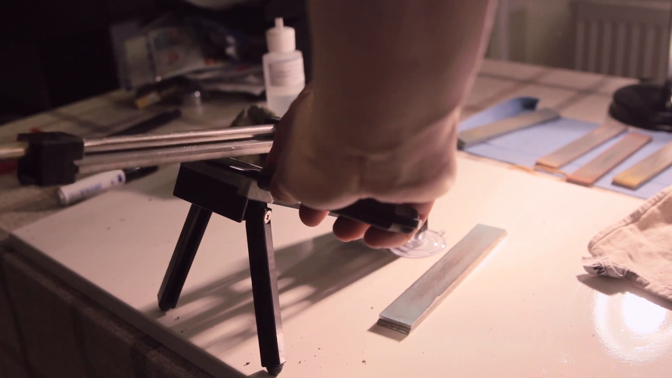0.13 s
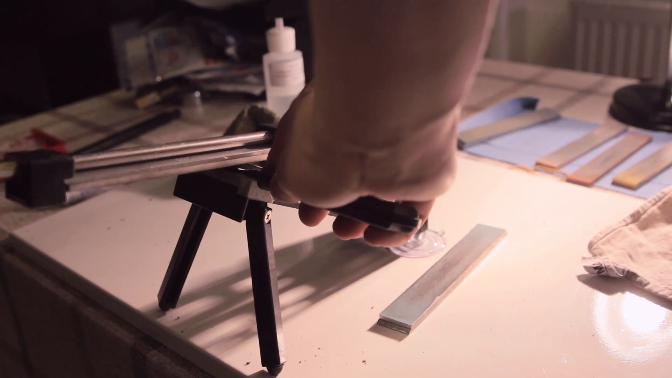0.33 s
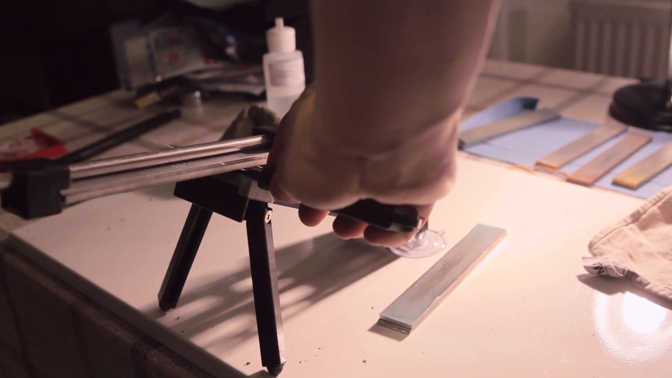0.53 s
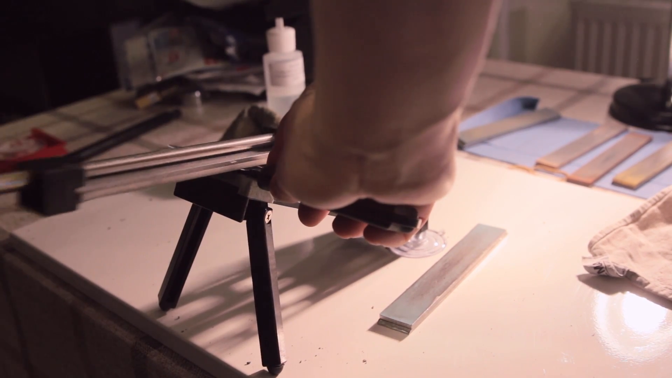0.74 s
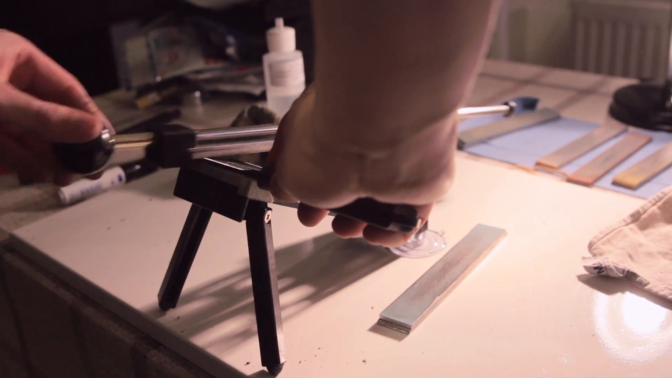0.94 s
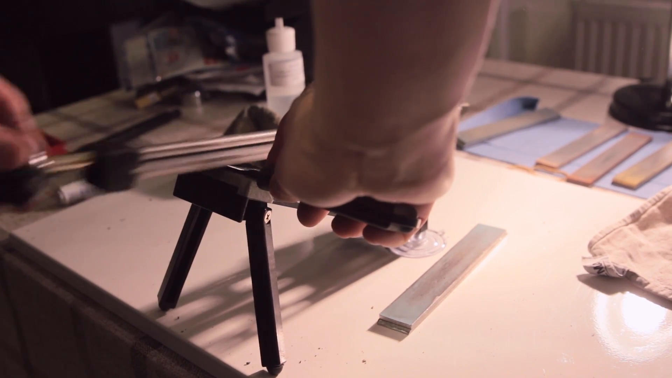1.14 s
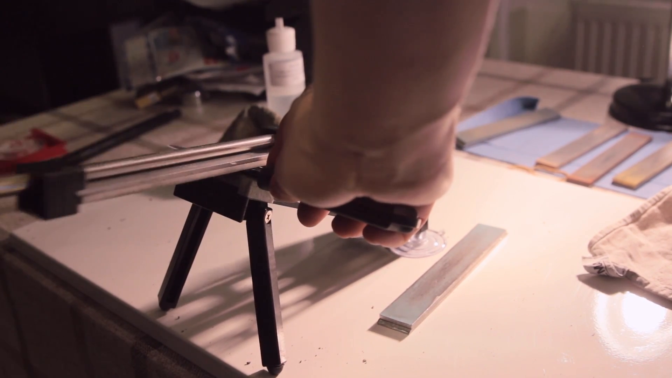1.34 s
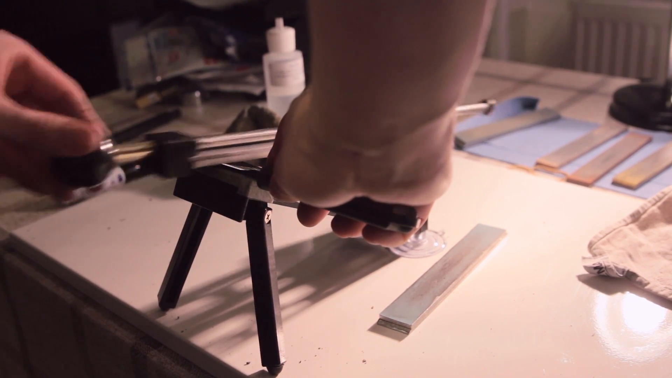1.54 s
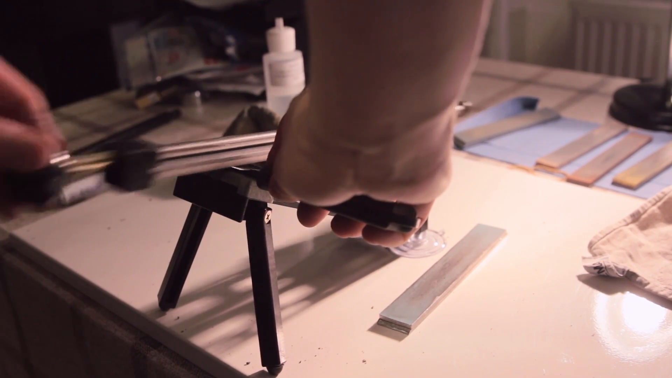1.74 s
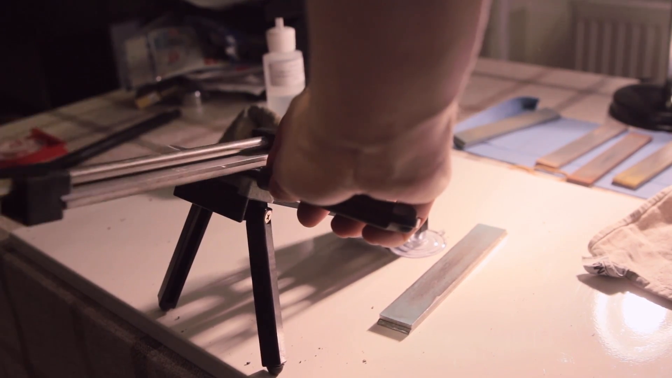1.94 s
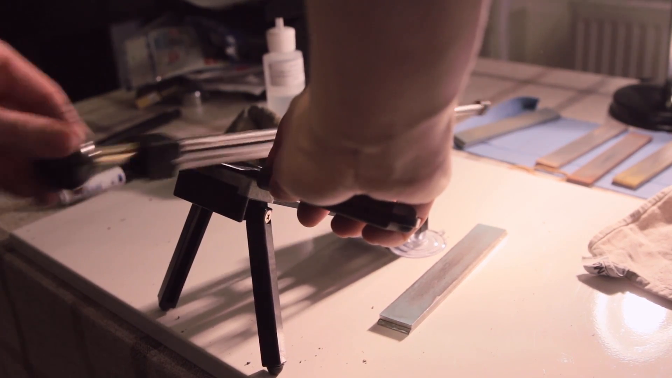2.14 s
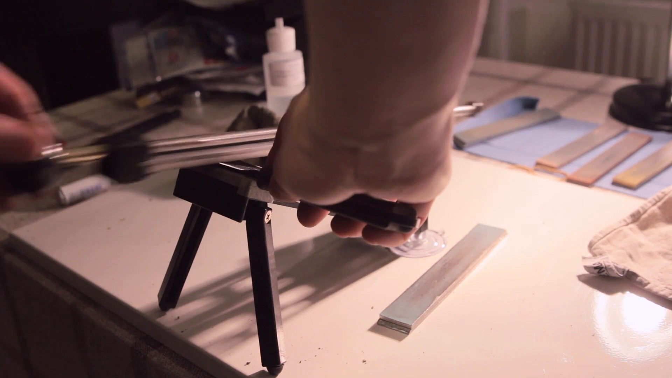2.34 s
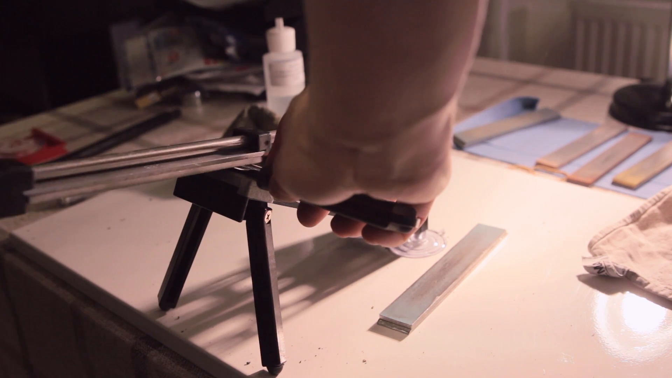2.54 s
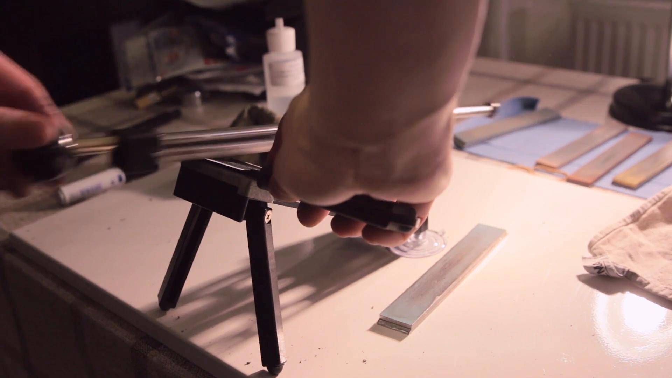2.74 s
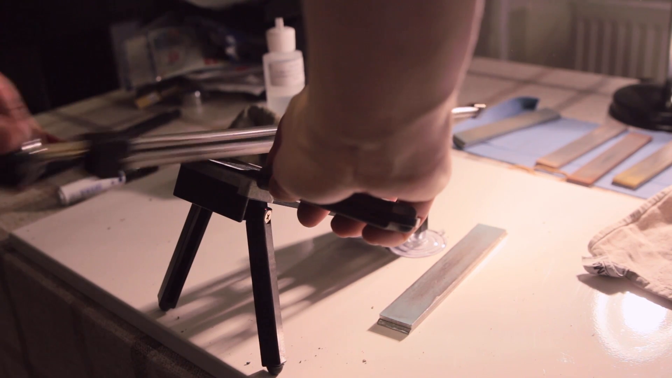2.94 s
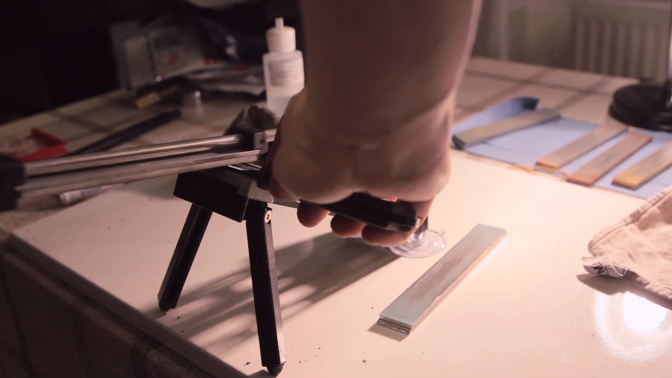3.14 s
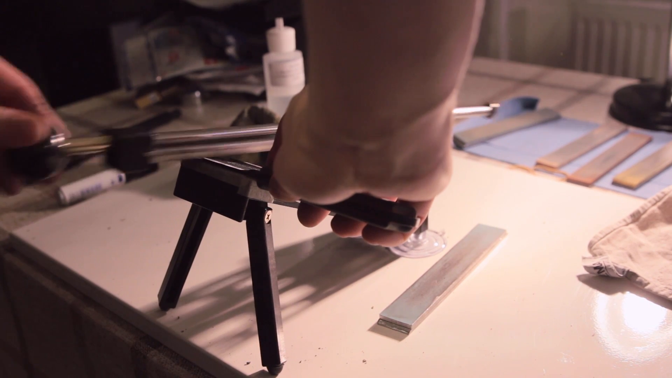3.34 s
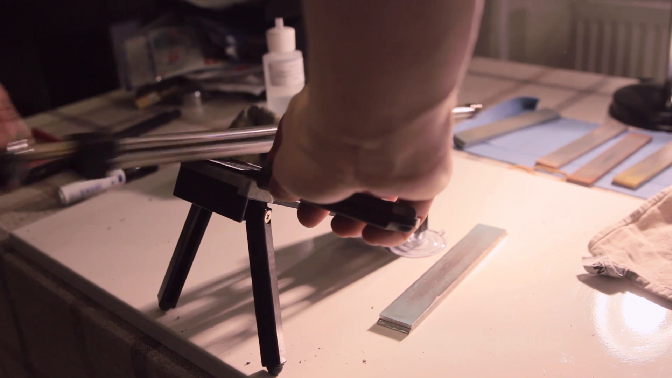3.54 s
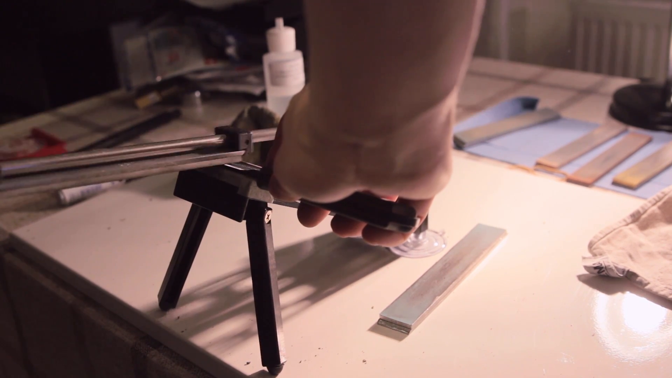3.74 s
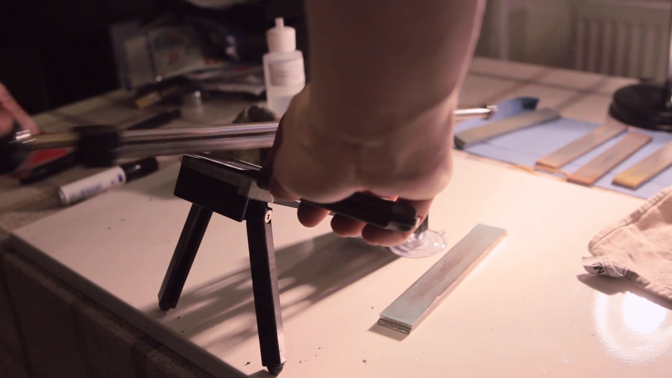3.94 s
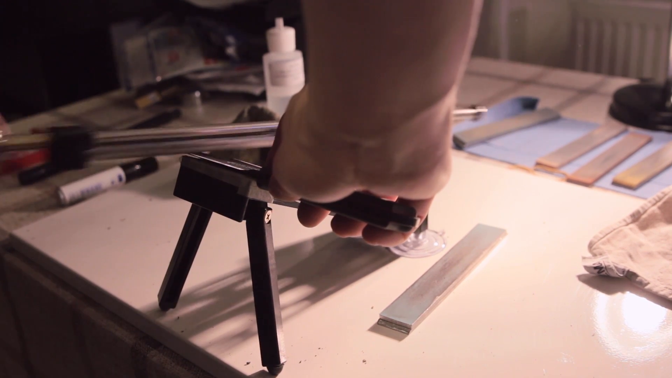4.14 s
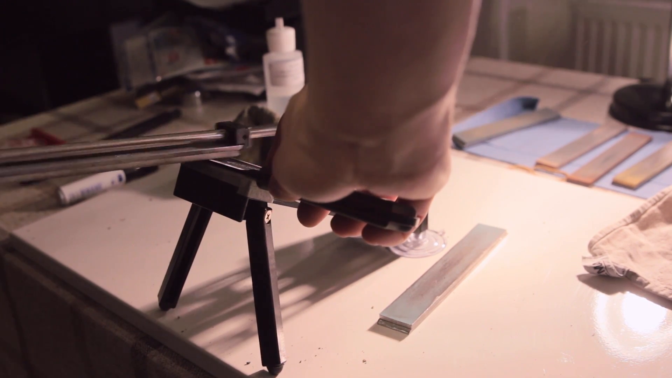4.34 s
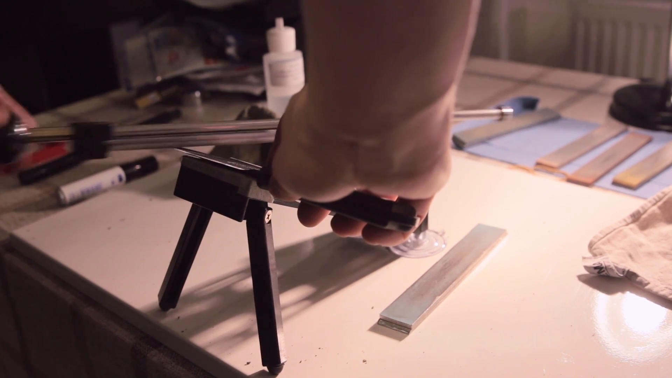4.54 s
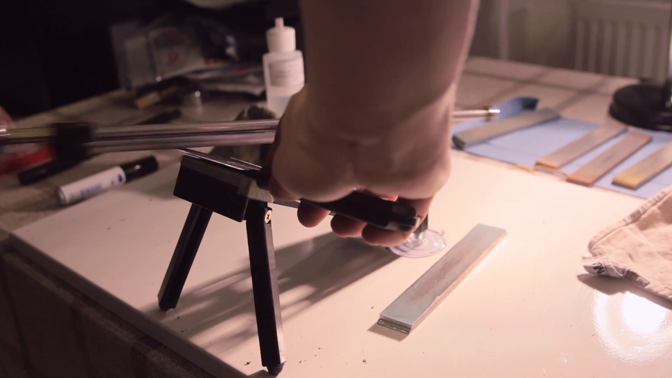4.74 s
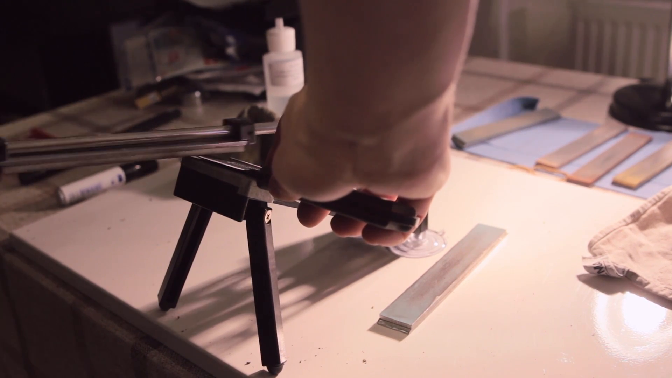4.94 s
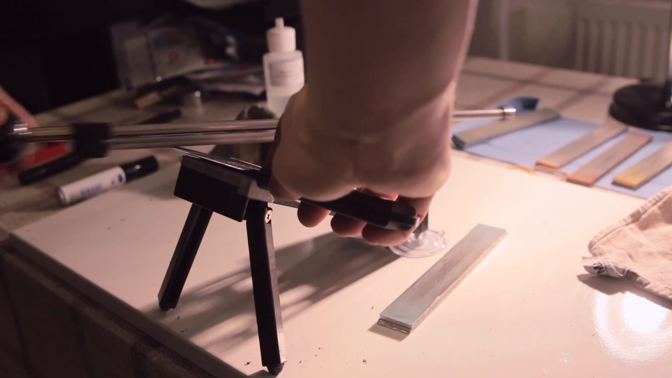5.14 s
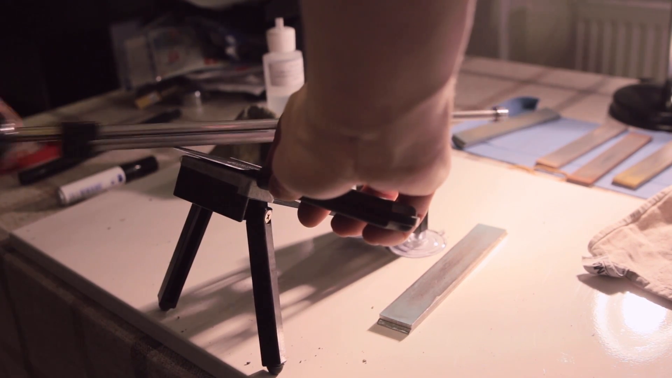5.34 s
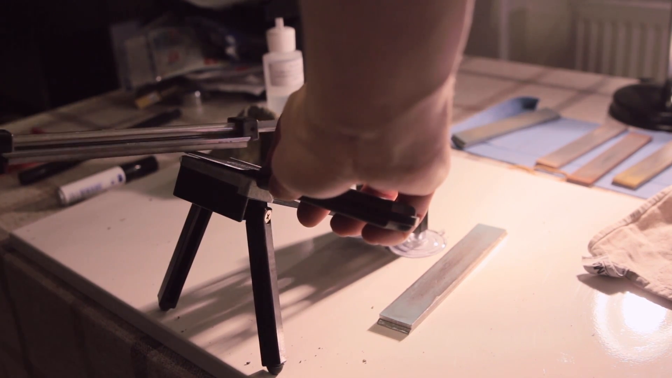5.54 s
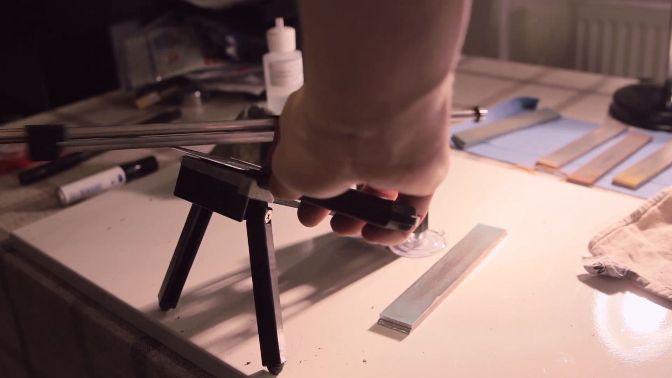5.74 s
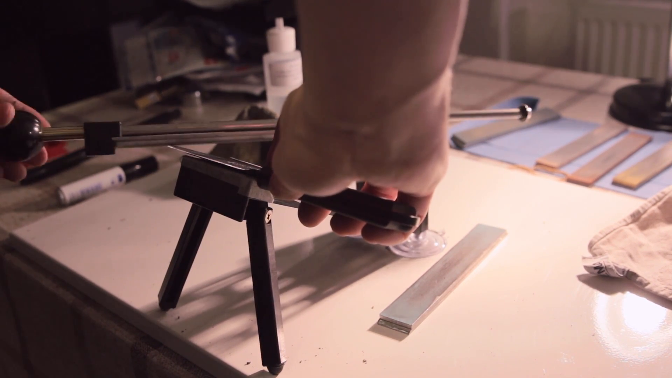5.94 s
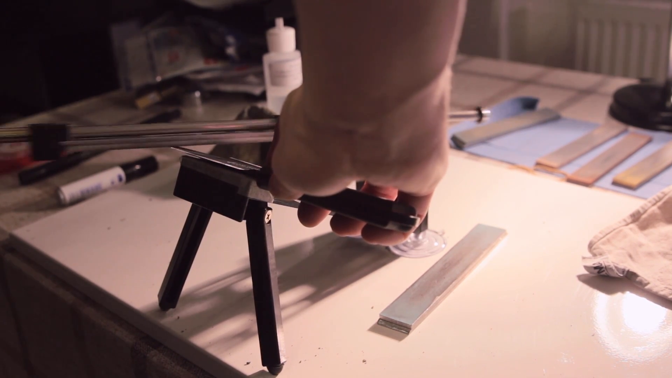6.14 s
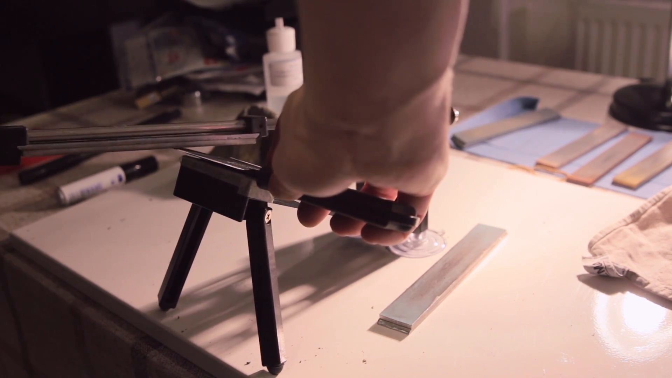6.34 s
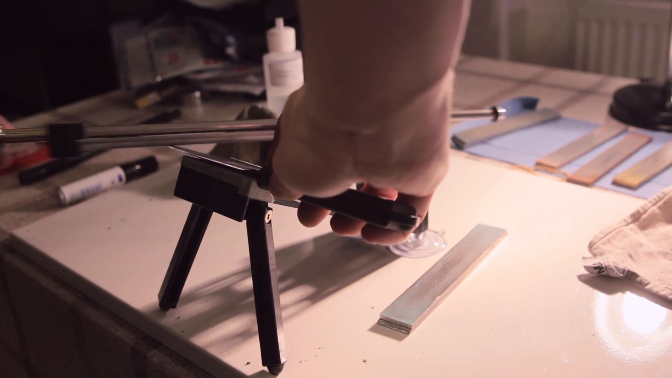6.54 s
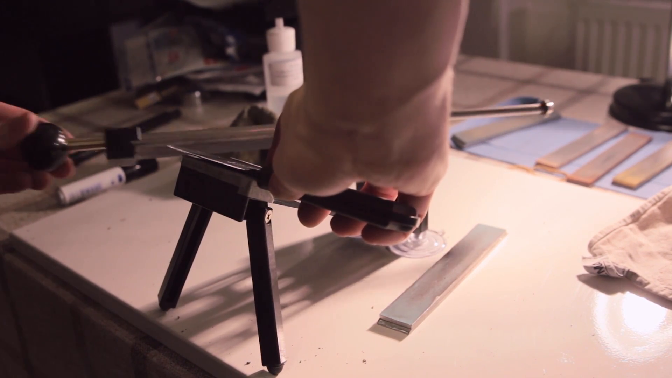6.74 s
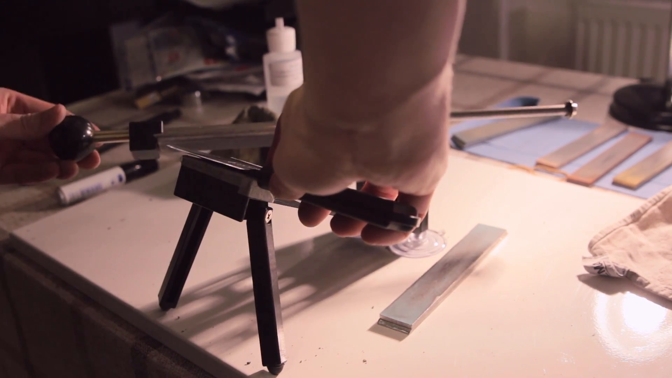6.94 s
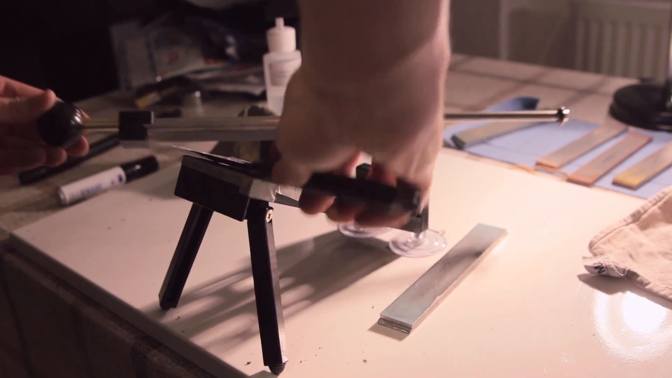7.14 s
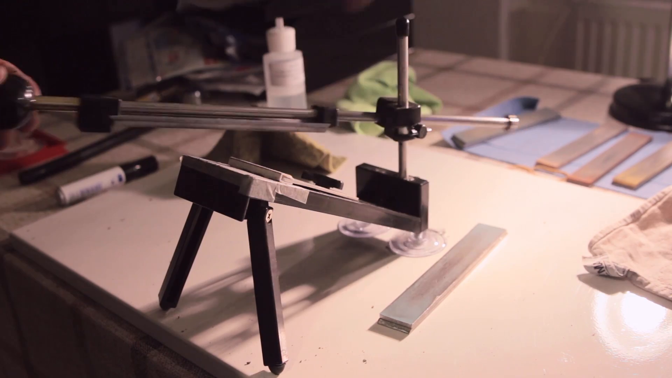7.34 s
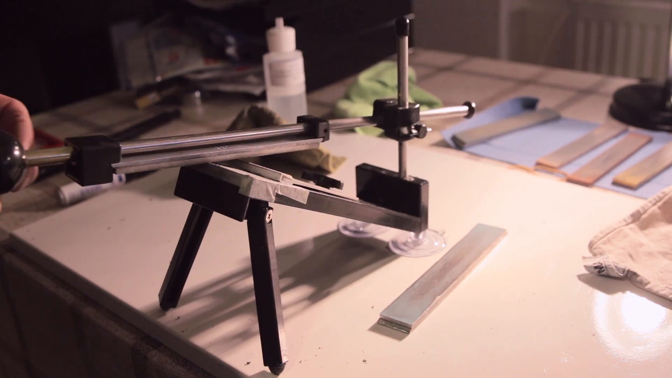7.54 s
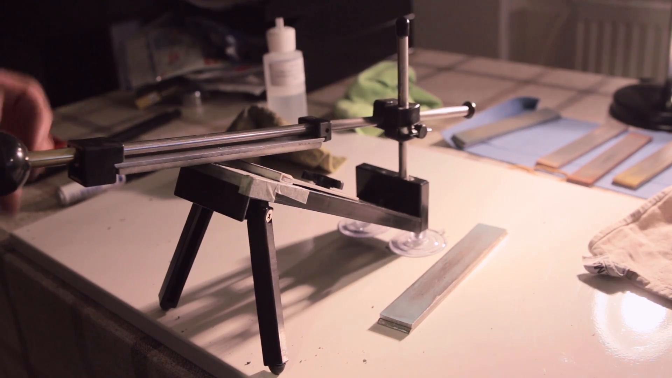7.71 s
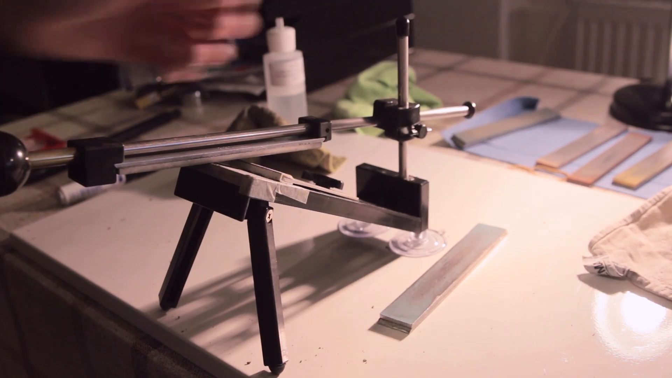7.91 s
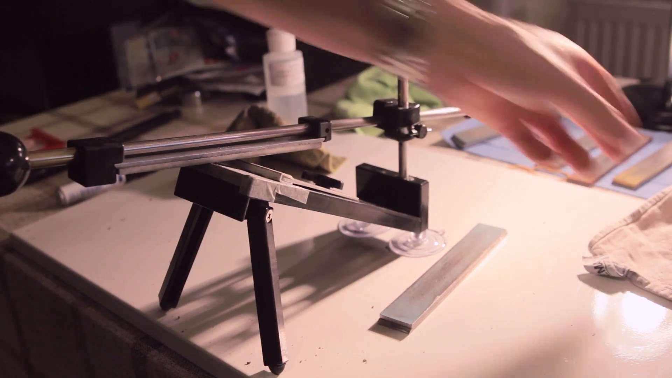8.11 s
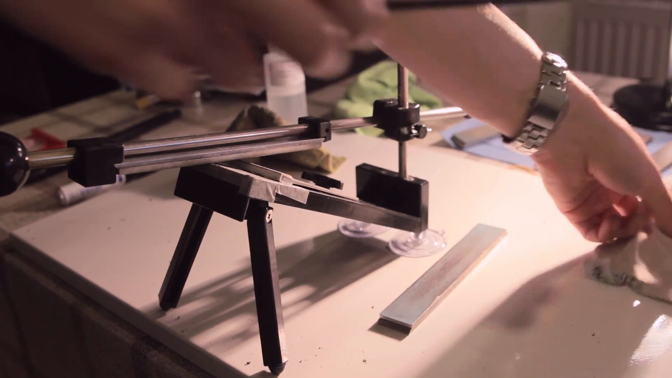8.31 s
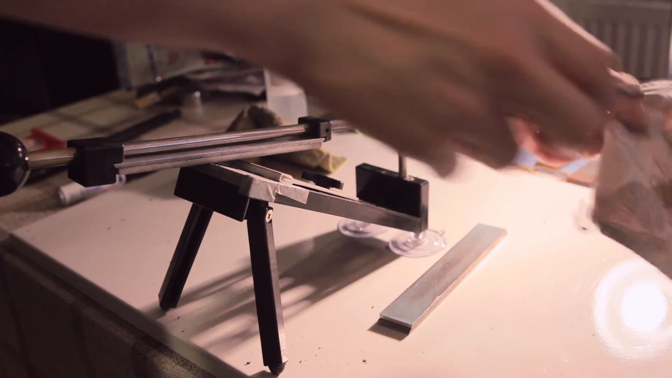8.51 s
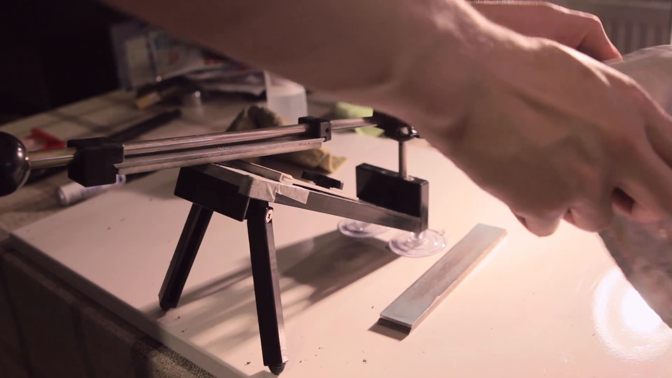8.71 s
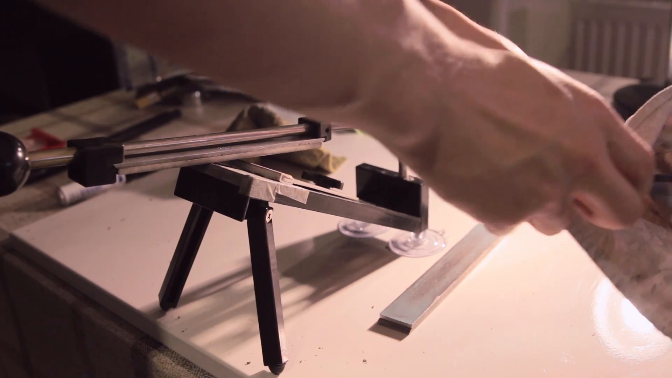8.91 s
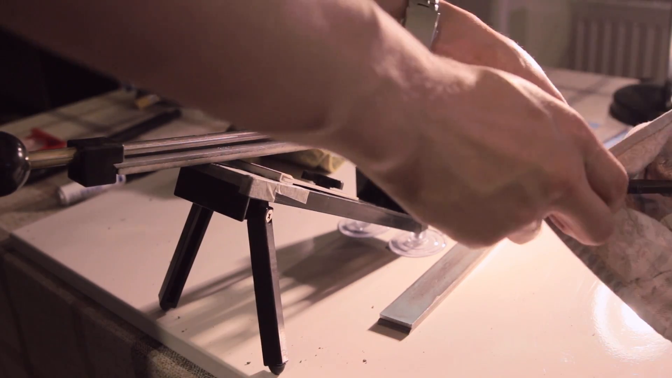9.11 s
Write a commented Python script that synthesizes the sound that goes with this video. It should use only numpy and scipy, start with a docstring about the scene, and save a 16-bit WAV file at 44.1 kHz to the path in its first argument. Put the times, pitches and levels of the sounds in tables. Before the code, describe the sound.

Close up on a table indoors: a low murmur and small taps, then nineteen quick alternating scrapes of gritty stone on knife steel, each swelling and dipping as the arm turns, with small metallic ticks among them. The stone lifts and trails off, the guide arm is knocked and set down with a short scuff, and very faint cloth rustles over quiet room hiss.

```python
"""A wet stone on a guided arm is drawn to and fro along a clamped knife in a small, faintly hissing room.
First a hand murmurs in the table (noise through its modes), with clicks (noise bursts through metal modes)
and knocks (short sines through table modes). Then 19 strokes: random grit drives gliding blade modes, stand
rasp and table shake. After the lift the scrape trails off; more taps and cloth puffs (band noise) follow.
The arm is set down with knocks and a short drag (shaped grit noise), and a last rustle of cloth ends it."""
import sys
import numpy as np
from scipy import signal
from scipy.fft import rfft, irfft, next_fast_len
from scipy.io import wavfile
from scipy.ndimage import uniform_filter1d, map_coordinates

SR = 44100
rng = np.random.default_rng(int(sys.argv[2]) if len(sys.argv) > 2 else 0)


def file_out(sig):
    """Save sig as 16-bit WAV at sys.argv[1]."""
    # one column per channel
    cols = np.atleast_2d(sig).T
    # limit, then scale
    lim = np.clip(cols, -1, 1)
    pcm = np.round(lim * 32767).astype(np.int16)
    wavfile.write(sys.argv[1], SR, pcm)


N = 404397

# room and microphone noise, shape only: f/Hz, relative density/dB
HUSH_SPECTRUM = [(12, -42), (20, -1.5), (27, -16.5), (123, -9), (186, -14), (246, -9.5), (495, -16),
                 (818, -17), (1280, -19.5), (1510, -21.5), (1640, -21.5), (2360, -23.5), (15800, -28.5)]
# left-right correlation of that noise: f/Hz, correlation/1
HUSH_CORRELATION = [(60, 0.26), (240, 0.56), (950, 0.5), (3770, 0.062), (15000, 0.062)]
# decay of the room: f/Hz, t60/s
ROOM_T60 = [(100, 0.79), (300, 0.51), (1500, 0.59), (4000, 0.33), (12000, 0.079)]
# strength of the room: f/Hz, level re direct/dB
ROOM_LEVEL = [(100, 0), (300, -3), (1000, -0.5), (3000, -7.5), (8000, -4.5), (15000, 0.5)]
# left-right correlation of the room: f/Hz, correlation/1
ROOM_CORRELATION = [(100, 1), (300, 0.58), (1000, 0.57), (4000, 0.57), (12000, 0.014)]
# sleeve and cloth rustle: centre t/s, half-length to -17 dB t/s, level/dB, centre f/Hz
CLOTH_PUFFS = [(7.333, 0.16, -70, 2500), (7.52, 0.1, -70, 2200), (8.15, .04, -70, 8000),
               (8.62, .06, -69, 7000), (8.73, .1, -71, 4500), (8.9, .06, -71, 2800),
               (9.038, .12, -69.5, 3500)]
# hand steering the arm to the edge, felt in the table: t/s, level/dB
HAND_LEVEL = [(.05, -99), (.2, -71), (.5, -64), (.75, -66.5), (.82, -99)]
# arm dragging on the table: t/s, level/dB
DRAG_LEVEL = [(0, -99), (8.24, -99), (8.245, -44.5), (8.3, -48.5), (8.32, -43.5), (8.45, -58), (8.5, -99)]
# colour of that drag, shape only: f/Hz, relative density/dB
DRAG_SPECTRUM = [(180, -37), (300, 3.5), (778, -11), (848, -8), (1110, -12.5), (1460, -18.5), (1940, -14),
                 (9000, -38), (11700, -72), (19800, -120)]
# modes of the table top under the stand: f/Hz, width/Hz, relative level/dB
TABLE_MODES = [(101, 8.9, -22), (118, 15.5, -20.5), (154.4, 17.4, -17), (168.4, 8, -12.5),
               (216.3, 17.3, -9), (248.7, 10.3, -5), (278.3, 22.5, -1), (330, 42.2, -7.5), (382, 19, -5.5),
               (425.6, 18.6, -3.5), (449, 22.2, -5.5), (568, 41, -19.5), (631, 46, -17)]
# modes of stand and arm: f/Hz, width/Hz, relative level/dB
STAND_MODES = [(560, 167, -5.5), (790, 196, -2), (1000, 150, -0.5), (1280, 88, 0), (1431, 48, 2),
               (1815, 270, -2)]
# blows that reach the table, levels before the trims in knocks():
# t/s, level/dB, f/Hz, length/s, stand rattle re blow/dB
KNOCK_EVENTS = [(0.517, -36.5, 260, 0.014, -17), (0.52, -48, 94, 0.028, -23), (0.545, -45, 240, 0.041, -20),
                (0.641, -55, 400, 0.03, -28), (0.704, -44, 295, 0.01, -28), (1.69, -31, 334, 0.0091, -13),
                (1.958, -36.5, 416, 0.0195, -10), (6.934, -50, 291, 0.034, -16),
                (6.99, -49, 305, 0.02, -28), (7.104, -47, 428, 0.019, -30), (7.197, -26, 292, 0.01, -24.5),
                (7.309, -50, 295, 0.0069, -16), (7.609, -41, 102, 0.027, -14),
                (7.612, -25, 432, 0.017, -23.5), (7.626, -28, 254.6, 0.016, -25),
                (7.641, -44, 236, 0.017, -13), (7.659, -35, 293, 0.016, -31), (8.24, -34, 426, 0.0047, -11),
                (8.302, -29, 271, 0.011, -13), (8.319, -21.5, 249, 0.0141, -30)]
# metal contacts, levels before the trims in clicks():
# t/s, level/dB, ring centre f/Hz, tick re ring/dB, ring t60/s
CLICK_EVENTS = [(0.5054, -49, 3900, -13, 0.043), (0.5174, -52, 1640, -15, 0.025),
                (0.6389, -58, 4010, -12, 0.14), (0.77, -50.5, 1600, -12, 0.022),
                (1.031, -41, 1280, -20, 0.075), (1.101, -41, 5870, -14, 0.023),
                (1.12, -36, 5920, -16, 0.03), (1.129, -38, 5920, -16, 0.025),
                (1.6855, -33, 2350, -22, 0.029), (1.703, -37, 1400, -20, 0.034),
                (1.719, -49, 3800, -16, 0.022), (1.746, -37, 5760, -18, 0.054),
                (1.9562, -30, 4500, -14, 0.072), (1.9662, -30.5, 3740, -12, 0.036),
                (1.975, -35, 4790, -17, 0.02), (2.027, -36, 5550, -3, 0.019),
                (3.617, -33.5, 5200, -15, 0.037), (3.7693, -36, 7800, -11, 0.04),
                (3.775, -32.5, 8500, -11, 0.03), (3.782, -34, 8000, -11, 0.03),
                (4.5223, -49, 3000, -13, 0.025), (4.83, -38, 8060, -12, 0.025),
                (4.8684, -31, 6700, -20, 0.044), (5.0275, -54, 3060, -11, 0.025),
                (7.194, -40.5, 5100, -8, 0.017), (7.2007, -39, 1400, -17, 0.012),
                (7.2464, -49, 2420, -16, 0.022), (7.6117, -46, 1050, -19, 0.027),
                (7.6198, -42, 1960, -23, 0.042), (7.6434, -42, 1000, -14, 0.055),
                (8.1635, -51, 7950, -13, 0.021), (8.1744, -55, 4710, -15, 0.025),
                (8.241, -46, 2000, -6, 0.025), (8.305, -39, 1920, -3, 0.03), (8.3083, -37, 4540, 1, 0.029),
                (8.345, -55, 1500, -14, 0.025), (8.3877, -46, 2080, -14, 0.021)]
# where the stone works on the blade: t/s, place/1 (0 near the handle, 1 near the point)
STONE_PLACE = [(.8, 0.44), (1.6, 0.26), (2.4, 0.25), (3.2, 0.4), (4, 0.59), (4.8, 0.78), (5.6, 0.85),
               (6.2, 0.98), (6.8, 0.88)]
# modes of stone and blade: f at the stone's near end/Hz, f aimed at for its far end/Hz (bend limited),
# width/Hz, level near handle/dB, level near point/dB, far(+) or near(-) end/dB, push(+) or pull(-)/dB
BLADE_MODES = [(2440, 2610, 196, 2.5, 4, 0.5, -0.5), (2990, 3040, 240, -6.5, 13.5, 1, 0.5),
               (3670, 3920, 390, 3, -1, 0.5, 1), (4130, 4220, 380, 3, 2.5, 0.5, -0.5),
               (4860, 4560, 470, 3.5, -2, -2, -1.5), (5430, 5200, 250, -30, 1, 8, 2),
               (5960, 5860, 410, 9.5, 4.5, 1, -2.5), (6770, 6960, 360, -13.5, -13.5, -3, -14.5),
               (7730, 7860, 250, 5, 6.5, 1, -2.5), (8180, 8620, 250, 12.5, 2, 2.5, -1),
               (9270, 9400, 410, 10, 16, 5, 2), (10260, 10370, 950, 6, 9, 5.5, 1.5),
               (11700, 11660, 590, 10, 13.5, 4.5, 1), (12500, 12600, 1700, -5, -7.5, 5, 14),
               (13360, 13300, 650, 4, 13.5, 5, 2), (15100, 15200, 1100, 5, 6, 5.5, 0.5)]
# strokes, push and pull in turn: start t/s, creep at that turn/dB, scrape swell over the stroke/dB,
# scrape level/dB, sheen re scrape/dB, table shake level/dB, shake swell over the stroke/dB,
# upper table modes re scrape/dB, stand rasp re scrape/dB,
# top of gliding hiss f/Hz, stroke share at that top/1 (kept to 0.05-0.95), glide strength/dB
STROKE_ROWS = [(0.771, -24, 12, -48, -2, -47.5, 9, -4, -13.5, 9400, 0.54, 7),
               (1.07, -31, -6, -48, -1, -50.5, -13, -1.5, -14.5, 8900, 0.65, 7),
               (1.389, -28, 7, -47, -3.5, -48, 15, -6, -11.5, 9900, 0.97, 8),
               (1.7, -25, -4, -47.5, -1, -50, 3, -4.5, -14.5, 9800, 0.15, 7.8),
               (2.0, -6.5, 5.5, -49.5, -3.5, -50.5, 9, -3, -10.5, 9700, 0.7, 9),
               (2.33, -6, -0.5, -45.5, -2, -52, 0, -6, -17, 10000, 0.3, 10),
               (2.62, -13.5, -1.5, -49, -2.5, -45, 10, -1.5, -10.5, 11400, 0.74, 2),
               (2.92, -25, 1, -48, -2, -51, -1, -4, -13.5, 13600, 0.33, 5),
               (3.21, -12, 3.5, -50, -3, -47.5, 5, -2.5, -9.5, 10500, 0.38, 3),
               (3.519, -21, 0, -48.5, -2, -49.5, -2, -7, -13, 12300, 0.6, 2),
               (3.81, -8, 9, -49, -5, -47, 5, -2.5, -8, 14600, 0.51, 8.8),
               (4.13, -8, -2.5, -49.5, -3, -54.5, 2, -11.5, -13, 14000, 0.5, 5.7),
               (4.41, -11.5, 6, -49.5, -4, -43.5, 6.5, -1, -7, 13500, 0.8, 5.5),
               (4.728, -31, -1, -50.5, -1.5, -51, -1, -8.5, -10, 11900, 0.22, 5.2),
               (5.02, -15, 8, -51, -3.5, -43.5, 5, -1, -7, 14000, 0.65, 5.9),
               (5.338, -21, -7.5, -51.5, -1, -52, -10, -10.5, -10.5, 13200, 0.14, 5.5),
               (5.65, -11, 3, -52.5, -3.5, -44.5, 2, -3.5, -6, 14500, 0.48, 8),
               (6.048, -31, 2, -53, -1.5, -53.5, 1, -9, -10, 14000, 0.55, 9.7),
               (6.402, -10, 20, -51.5, -6.5, -45.5, 11.5, 0, -6, 13500, 0.25, 8)]

HUSH_DB = -59.5
CLOTH_SIGMA_OCT = 0.9
SPLIT_HZ = 350  # deep table modes below, upper ones above
LAND_S, LIFT_S, LIFT_T60_S = .03, 6.826, 0.03
NEXT_TURN_S = 6.832  # the last push leaves the edge at speed
TRAIL_DB, TRAIL_T60_S = -16.5, 0.37  # the stone trails off lightly after the lift
PACE_POWER = 0.6  # loudness against the swing of the arm
SHEEN_DIP, SHAKE_DIP, UPPER_DIP, RASP_DIP = 1.47, 0.58, 0.47, 0.73  # sink at a turn, scrape = 1
UPPER_SWELL, RASP_SWELL = 1, 0.64  # share of the shake's swell
SHAKE_ARCH_DB = 3.5  # the hand bears down in mid stroke
GLIDE_REST_HZ, GLIDE_POWER, GLIDE_LIFT = 8050, 1.08, 0.36
GLIDE_WIDTH_HZ = (200, 560)  # near handle, near point
MAX_BEND, WANDER = .04, .008  # pitch shares: along the stone; from pressure and angle
SHEEN_FROM_HZ = 8400
BAND_LIMIT_HZ = 15780


def amp(db):
    """Gain of a level in dB."""
    return 10 ** (np.asarray(db) / 20)


def unit(x):
    """x at rms 1."""
    return x / np.sqrt(np.mean(x ** 2) + 1e-20)


def along(points, hz):
    """(Hz, value) points interpolated on a log frequency axis."""
    f, v = np.transpose(points)
    return np.interp(np.log(hz + 1), np.log(f + 1), v)


def curve(rows):
    """(s, value) points as one value per sample."""
    s, value = np.transpose(rows)
    return np.interp(np.arange(N) / SR, s, value)


def wobble(knots_per_s):
    """A smooth random curve through normally distributed knots."""
    knots = rng.standard_normal(int(N * knots_per_s / SR) + 4)
    return map_coordinates(knots, [np.arange(N) * knots_per_s / SR])


def filtered(x, response):
    """x times a complex response of frequency."""
    m = next_fast_len(N + SR // 2)
    return irfft(rfft(x, m) * response(np.fft.rfftfreq(m, 1 / SR)), m)[..., :N]


def modes(table):
    """Causal response of parallel resonances, alternating in sign."""
    def response(f):
        return sum((-1) ** k * amp(db) * 1j * f * w / (c * c - f * f + 1j * f * w)
                   for k, (c, w, db) in enumerate(table))
    return response


def paired(pair, correlation):
    """Two unrelated signals mixed to a left and right of given correlation."""
    def mid_side(hz):
        angle = np.arccos(np.clip(along(correlation, hz), -1, 1)) / 2
        return np.array([np.cos(angle), np.sin(angle)])
    mid, side = filtered(pair, mid_side)
    return np.array([mid + side, mid - side])


def grit(grains_per_s, spread_db, slurry):
    """Single grains catching the edge, a few of them large, over the smooth hiss of wet slurry."""
    caught = rng.random(N) < grains_per_s / SR
    size = amp(spread_db * np.minimum(rng.exponential(size=N), 4))
    grains = caught * size * rng.standard_normal(N)
    return unit(unit(grains) + slurry * rng.standard_normal(N))


def hush():
    """Room and microphone hiss: shaped stereo noise, very slightly unsteady."""
    noise = filtered(rng.standard_normal((2, N)), lambda hz: amp(along(HUSH_SPECTRUM, hz)))
    return amp(HUSH_DB + 0.059 * wobble(0.78)) * unit(paired(noise, HUSH_CORRELATION))


def room(x):
    """Noise tail in which each frequency dies at its own speed."""
    hz, t, z = signal.stft(rng.standard_normal((2, SR)), SR, nperseg=256)
    fade = amp(-60 * t / along(ROOM_T60, hz)[:, None])
    fade *= amp(along(ROOM_LEVEL, hz))[:, None] / np.linalg.norm(fade, axis=1, keepdims=True)
    tail = signal.istft(z * fade, SR, nperseg=256)[1] / np.sqrt(128)
    late = np.pad(x, (350, 0))[None]  # delay in samples
    return paired(signal.fftconvolve(late, tail, axes=1)[:, :N], ROOM_CORRELATION)


def cloth():
    """Faint dry rustle: Gaussian puffs of band-passed fibre grit."""
    t = np.arange(N) / SR
    fibres = grit(grains_per_s=900, spread_db=2.5, slurry=1.2)
    out = np.zeros(N)
    for s, half_s, db, centre_hz in CLOTH_PUFFS:
        band = lambda hz: np.exp(-(np.log2((hz + 1) / centre_hz) / CLOTH_SIGMA_OCT) ** 2 / 2)
        puff = np.exp(-((t - s) / half_s) ** 2 * 2)
        out += amp(db) * puff * unit(filtered(fibres, band))
    return out


def hand():
    """Low murmur of the table: noise through its modes."""
    return amp(curve(HAND_LEVEL)) * unit(filtered(rng.standard_normal(N), modes(TABLE_MODES)))


def slide():
    """Short dry drag of the arm on the table: grit noise of fixed colour."""
    dry_grit = grit(grains_per_s=3200, spread_db=0.0, slurry=2.6)
    rustle = filtered(dry_grit, lambda hz: amp(along(DRAG_SPECTRUM, hz)))
    return amp(curve(DRAG_LEVEL)) * unit(rustle)


def knocks():
    """A springy blow pushes the table for a few cycles, leaves it ringing and rattles the stand."""
    push, rattle = np.zeros(N + SR), np.zeros(N + SR)
    t = np.arange(SR // 10) / SR
    for s, db, centre_hz, length_s, rattle_db in KNOCK_EVENTS:
        span = slice(round(s * SR), round(s * SR) + len(t))
        touch = np.sin(np.pi * np.minimum(t / max(length_s, .002), 1)) ** 0.29
        push[span] += amp(db) * touch * np.sin(2 * np.pi * centre_hz * t)
        rattle[span] += amp(db + rattle_db + 13.5) * touch * rng.standard_normal(len(t))
    table = amp(-4) * filtered(push[:N], modes(TABLE_MODES))
    return 0.49 * push[:N] + table + filtered(rattle[:N], modes(STAND_MODES))


def clicks():
    """A contact is a short burst that rings the modes near its centre, led by a bright tick."""
    ring, tick = np.zeros(N + SR), np.zeros(N + SR)
    t = np.arange(SR // 10) / SR
    hz = np.fft.rfftfreq(len(t), 1 / SR)
    for s, db, centre_hz, tick_db, t60_s in CLICK_EVENTS:
        span = slice(round(s * SR), round(s * SR) + len(t))
        colour = 1 / (1 + (np.log((hz + 1) / centre_hz) / 0.62) ** 2)
        burst = unit(irfft(rfft(rng.standard_normal(len(t))) * colour, len(t)))
        fade_db = -60 * t / max(t60_s, .002)
        ring[span] += amp(db + fade_db) * burst
        # the tick dies 1.9 times as fast
        tick[span] += amp(db + tick_db - 11 + 1.9 * fade_db) * rng.standard_normal(len(t))
    stand = [(f, w, 0) for f, w, _ in STAND_MODES[2:]]
    metal = modes(stand + [(row[0 + 1], row[2], 0) for row in BLADE_MODES])  # far-end pitches
    bright = lambda f: 1 / np.sqrt(1 + (6000 / (f + 1)) ** 4)
    return amp(-5.5) * (filtered(ring[:N], metal) + ring[:N]) + filtered(tick[:N], bright)


def stroke_phase(t):
    """Strokes gone by, counted from turn to turn; whole numbers are turns of the arm."""
    turns_s = [row[0] for row in STROKE_ROWS] + [NEXT_TURN_S]
    return np.interp(t, turns_s, np.arange(len(STROKE_ROWS) + 1))


def swing(t):
    """Stroke number, share of it done and dip in dB as the arm slows at each turn."""
    phase = stroke_phase(t)
    which = np.minimum(phase.astype(int), len(STROKE_ROWS) - 1)
    moving = np.minimum(phase, len(STROKE_ROWS) - .51)  # no halt ends the last stroke
    creep = amp(np.array(STROKE_ROWS)[np.round(moving).astype(int), 1])
    pace = np.abs(np.sin(np.pi * moving)) ** PACE_POWER
    return which, phase - which, 10 * np.log10(pace ** 2 + creep ** 2)


def mode_peak(hz, centre_hz, width_hz):
    """Power curve of one resonance, peak 1."""
    return 1 / (1 + (1.4 * (hz - centre_hz) / width_hz) ** 2) ** 2


def blade_power(hz, t, place):
    """Mode power over time: pitch and strength follow the point of contact."""
    phase = stroke_phase(t)
    far = (1 - np.cos(np.pi * phase)) / 2
    push = np.tanh(3 * np.sin(np.pi * phase))
    frame = np.minimum((t * SR).astype(int), N - 1)
    power = amp(-3.5) ** 2  # many weak modes fill the gaps
    for near_hz, far_hz, width_hz, heel_db, point_db, far_db, push_db in BLADE_MODES:
        bend = np.clip(far_hz / near_hz - 1, -MAX_BEND, MAX_BEND)
        centre_hz = near_hz * (1 + bend * far + WANDER * wobble(5.7)[frame])
        db = heel_db + (point_db - heel_db) * place + far_db * (2 * far - 1) + push_db * push
        db = db + 2.6 * wobble(18)[frame]
        power = power + amp(db) ** 2 * mode_peak(hz, centre_hz, width_hz)
    return power


def add_glide(power, hz, t, place):
    """A hiss band glides up and down in each stroke and lifts the modes it passes."""
    which, done, _ = swing(t)
    *_, top_hz, tops_at, db = np.array(STROKE_ROWS)[which].T
    tops_at = np.clip(tops_at, .05, .95)
    arch = np.minimum(done / tops_at, (1 - done) / (1 - tops_at)) ** GLIDE_POWER
    centre_hz = GLIDE_REST_HZ + (top_hz - GLIDE_REST_HZ) * arch
    band = mode_peak(hz, centre_hz, np.interp(place, [0, 1], GLIDE_WIDTH_HZ))
    power = power * (1 + GLIDE_LIFT * band) + amp(db) ** 2 * band
    return power * (0.41 + 1 / (1 + (hz / (1.02 * centre_hz)) ** 12))  # weaker above the glide


def ringing(force):
    """The rubbing force coloured by the moving blade modes, as scrape and sheen at rms 1."""
    hz, t, z = signal.stft(force, SR, nperseg=768)
    hz = hz[:, None]
    place = np.clip(np.interp(t, *np.transpose(STONE_PLACE)), 0, 1)
    power = add_glide(blade_power(hz, t, place), hz, t, place)
    power = power / (1 + (2200 / (hz + 1)) ** 8)
    patches = uniform_filter1d(rng.standard_normal(z.shape), size=7, axis=0)
    patches = uniform_filter1d(patches, size=5, axis=1)
    power = power * amp(2.17 * unit(patches)) ** 2  # grit lies unevenly on the stone
    parts = []
    for band in (hz < SHEEN_FROM_HZ, hz >= SHEEN_FROM_HZ):
        p = power * band
        shaped = z * np.sqrt(p / p.mean(0))
        parts.append(unit(signal.istft(shaped, SR, nperseg=768)[1][:N]))
    return parts


def contact(t):
    """Gain of the stone's touch: lands, lifts, then trails off lightly."""
    land = np.clip((t - STROKE_ROWS[0][0]) / LAND_S + .5, 0, 1)
    fade = lambda t60_s: amp(-60 * np.maximum(t - LIFT_S, 0) / t60_s)
    return land * np.maximum(fade(LIFT_T60_S), amp(TRAIL_DB) * fade(TRAIL_T60_S))


def strokes():
    """Grit force rings the blade and rasps in the stand; juddering noise shakes the table."""
    t = np.arange(N) / SR
    which, done, dip_db = swing(t)
    rows = np.array(STROKE_ROWS)[which].T
    _, _, grow_db, scrape_db, sheen_db, shake_db, swell_db, upper_db, rasp_db, *_ = rows
    touch = contact(t)
    gain = lambda db, dip: touch * amp(uniform_filter1d(db, size=900) + dip * dip_db)
    edge_db = scrape_db + grow_db * (done - .5)
    swell_db = swell_db * (done - .5) - SHAKE_ARCH_DB * np.cos(np.pi * done) ** 2

    force = grit(grains_per_s=3000, spread_db=3.0, slurry=1.9)
    force = force * amp(0.7 * wobble(14) + 1.43 * wobble(55))
    scrape, sheen = ringing(force)
    # fast motion reaches the upper modes
    edge = gain(edge_db, 1) * scrape + gain(edge_db + sheen_db, SHEEN_DIP) * sheen
    rasp = unit(filtered(force, modes(STAND_MODES)))
    rasp = gain(scrape_db + rasp_db + RASP_SWELL * swell_db, RASP_DIP) * rasp

    judder = amp(1.6 * wobble(25) + 2.4 * wobble(11)) * rng.standard_normal(N)
    deep = unit(filtered(judder, modes([m for m in TABLE_MODES if m[0] < SPLIT_HZ])))
    upper = unit(filtered(judder, modes([m for m in TABLE_MODES if m[0] > SPLIT_HZ])))
    deep = gain(shake_db + swell_db, SHAKE_DIP) * deep
    upper = gain(scrape_db + upper_db + UPPER_SWELL * swell_db, UPPER_DIP) * upper
    return edge + deep, rasp + upper


def scene():
    """Blade, deep shake and taps a little left; stand rasp and upper table a little right."""
    edge, stand = strokes()
    taps = clicks() + knocks() + slide() + cloth() + hand()
    direct = (edge + taps) * amp([[.6], [-.6]]) + stand * amp([[-.7], [.7]])
    return direct + room(edge + stand) + room(taps) + hush()


def record(dry):
    """Nothing passes above the band limit."""
    return filtered(dry, lambda hz: hz < BAND_LIMIT_HZ)


dry = scene()
out = record(dry)
file_out(out)
```